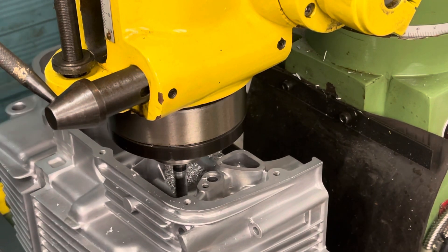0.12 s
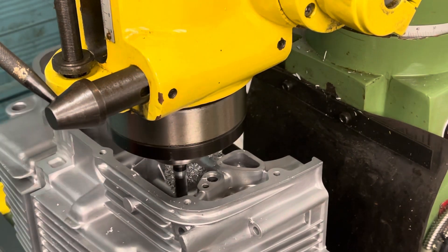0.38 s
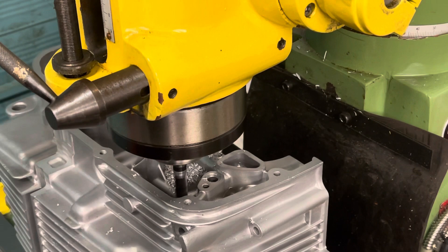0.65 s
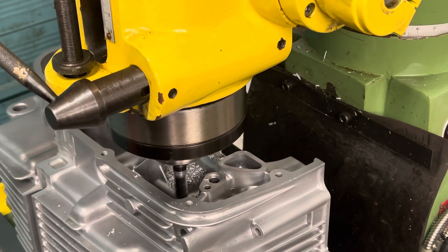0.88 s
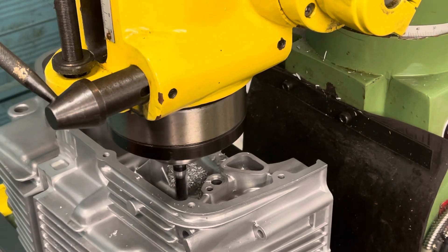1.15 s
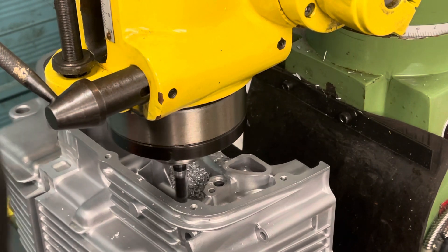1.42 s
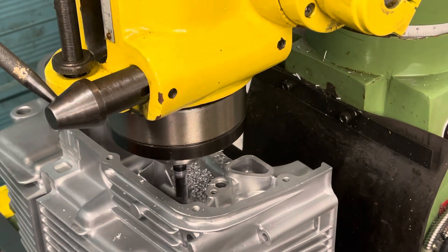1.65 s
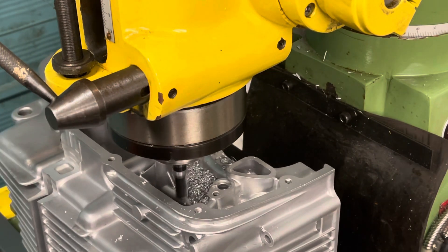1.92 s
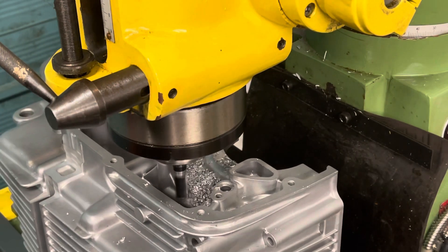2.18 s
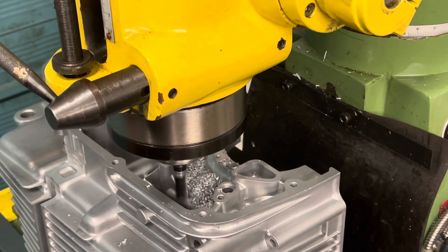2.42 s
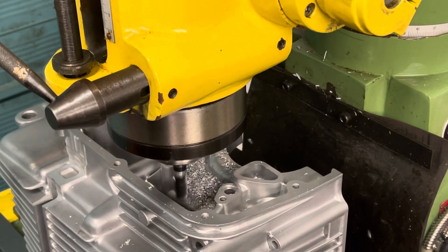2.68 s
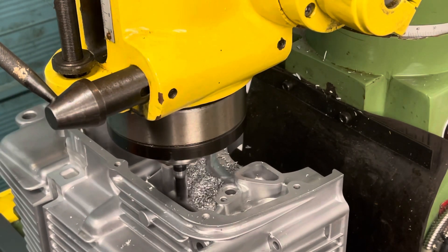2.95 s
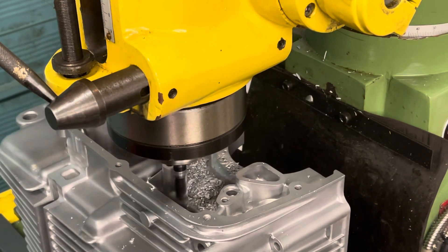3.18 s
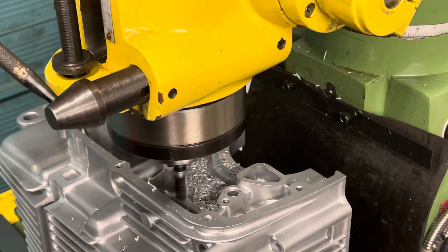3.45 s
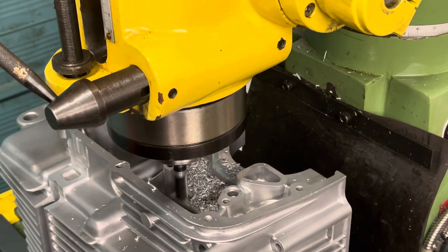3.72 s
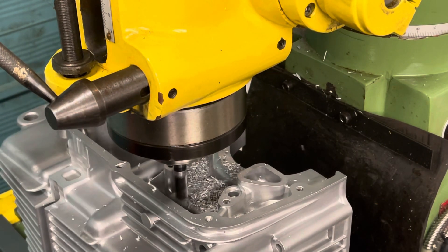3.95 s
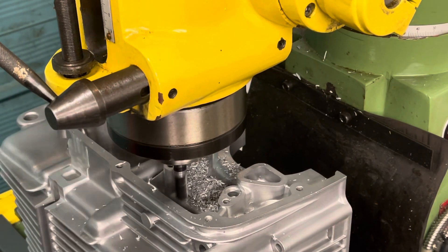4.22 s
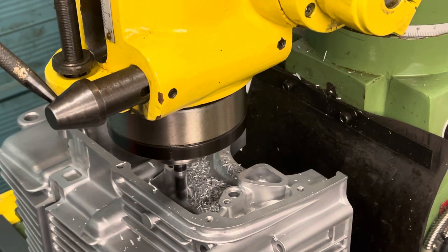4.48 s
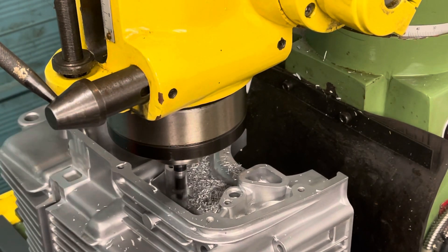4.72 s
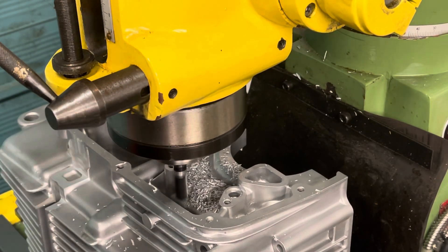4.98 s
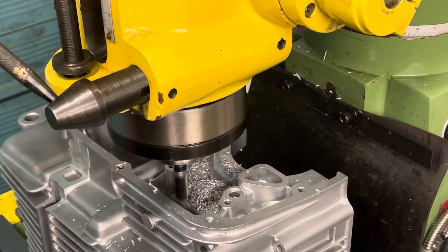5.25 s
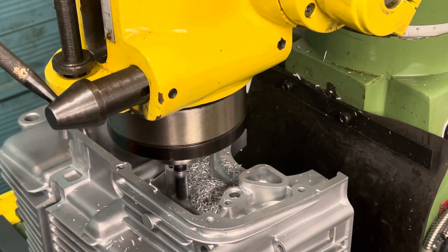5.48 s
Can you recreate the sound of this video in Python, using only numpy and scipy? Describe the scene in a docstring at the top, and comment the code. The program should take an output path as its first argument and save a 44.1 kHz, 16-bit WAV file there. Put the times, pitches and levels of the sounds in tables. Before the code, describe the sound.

Heard close in a small workshop, a milling machine runs constantly with mid hum, piercing high gear whine and bright airy hiss. An end mill bites repeatedly into an aluminium casting, each bite a buzzy singing tone with grainy chip rasp, broken by short free-running gaps. The middle bites are loudest; late ones add brief chatter whistles. Stereo phone microphone, very dry, with a tiny tail from near walls.

```python
"""A machine hums, whines and hisses close by, and a cutter sings and rasps through metal, sometimes chattering near 2 kHz.
It is a four-flute end mill, geared up to high speed, biting in and out of an aluminium casting close to a phone.
The drive all round is many thin gear, bearing and belt tones over coloured noise, sagging a little under load.
The cut straight ahead is sines at the flute rate and spindle orders, noise rung by the casting, and gliding whistles.
A short tail from the near walls differs between the two microphone channels."""
import sys
import numpy as np
from scipy import signal
from scipy.fft import rfft, irfft, next_fast_len
from scipy.io import wavfile
from scipy.ndimage import uniform_filter1d, map_coordinates

SR = 44100
rng = np.random.default_rng(int(sys.argv[2]) if len(sys.argv) > 2 else 0)


def master(y):
    """Save y as 16-bit WAV."""
    cut = np.clip(np.atleast_2d(y).T, -1, 1)
    pcm = np.round(cut * 32767)  # scale
    wavfile.write(sys.argv[1], SR, pcm.astype(np.int16))


def makeup_ratio(level_db):
    """Linear amplitude ratio for a level in decibels (20 dB per factor of ten)."""
    decades = np.asarray(level_db, float) / 20
    return 10 ** decades


N = 247663
TIME = np.arange(N) / SR
SPINDLE_HZ, CAGE_HZ, MESH_HZ = 184.87, 74.05, 872.65  # at nominal speed, as all drive tones below
PULLEY_HZ, IDLER_HZ = 70.44, 289.75

# hiss of the running drive: (frequency [Hz], relative level per hertz [dB])
HISS = [(25, -26), (160, -29), (250, -20), (400, -12.5), (520, -2.5), (1000, -3), (1600, 1), (3000, -1),
        (4700, -1.5), (5500, -5), (6200, 1.5), (8600, -2.5), (12000, -2), (15400, -2)]
# housing resonances added to the hiss: (centre [Hz], width [Hz], gain [dB])
HOUSING = [(726, 162, 16), (1450, 17, 9), (2197, 186, 8), (3860, 48, 5), (4350, 480, 1), (5160, 130, 3.5),
           (6720, 183, 9), (7300, 420, 1), (7870, 660, 3.5), (9440, 620, 5.5), (10760, 890, 8),
           (12240, 1300, -1), (13350, 480, 11), (13950, 330, 4), (14400, 160, -6), (14900, 450, 9.5),
           (15000, 280, 6)]
# likeness of the hiss at the two microphones: (frequency [Hz], correlation [0 to 1])
ALIKE = [(60, .3), (130, 0.59), (250, 0.96), (1500, 1), (3000, 0.99), (5000, 0.76), (6800, 0.44),
         (9000, 0.87), (15000, 0.98)]
# drive speed, sagging under load: (time [s], change [parts per thousand])
SPEED = [(0, 1.2), (.26, 1.7), (.6, 1.6), (.71, 1.04), (1.06, .35), (1.43, .3), (2.27, 0), (2.78, 0),
         (2.9, 1.4), (3.06, -.5), (3.11, 0), (3.45, -.2), (3.54, 1), (3.7, 1.5), (3.83, 0), (4, 0),
         (4.12, 1.46), (4.2, 1.7), (4.33, 1.3), (4.42, -.2), (4.76, 0), (4.95, 1.5), (5.26, 1.8),
         (5.35, 1.35), (5.62, 2.1)]
# hum of motor, belt and housing: (frequency [Hz], level [dB rms])
HUM = [(261.8, -82), (364.7, -75), (483.2, -57.9), (571.3, -57.5), (601.6, -49.2), (650.0, -55.4),
       (659.5, -58.3), (668.2, -58.2), (676.3, -49.8), (772.5, -51.2), (800.8, -49.0), (814.9, -57.3),
       (965.6, -64.5), (1062.5, -61.8), (1415.8, -62.8), (1421.2, -62.0), (1895.6, -56.1), (2407.7, -56.7),
       (2464.9, -61.9), (3416.4, -62.4), (3565.1, -62.8), (3627.0, -60.2), (3640.5, -61.9), (3812.7, -59.9),
       (3893.5, -60.9)]
# hum of a pulley: (order [turns], level [dB rms])
PULLEY = [(6, -70.1), (7, -55.6), (8, -56.5), (9, -49.1), (10, -48.1), (13, -63.1), (15, -64.8),
          (20, -62.7), (31, -58)]
# hum of an idler shaft: (order [turns], level [dB rms])
IDLER = [(1, -78), (2, -46), (3, -59.5), (5, -55.2)]
# whine of gears and bearings, before its swell: (frequency [Hz], level [dB rms], left over right [dB])
WHINE = [(4368.5, -45.7, -2.8), (4513.9, -59.6, -2.2), (5096.6, -57.6, 1.6), (5824.7, -62.5, -2.6),
         (6466.7, -54, .4), (6482.2, -58.3, 0), (6552.8, -48.3, -1.2), (6622.8, -56, -1.4),
         (6637.6, -59.1, 2.2), (6667.2, -47.7, 2), (6737.9, -58, 5.9), (6752.7, -46.5, 3.7),
         (6822, -48, 10), (6867.7, -51.1, 0), (6952.5, -57.9, -2.4), (7022.5, -48.5, -1.2),
         (7280.9, -50.2, 0), (7343.5, -56.1, -.5), (7637.6, -56.7, -2), (7965.3, -54.3, 1.5),
         (8008.3, -59.6, .5), (8038.6, -57.9, .6), (8737.1, -55.9, 0), (9264, -60.3, 0),
         (9292.9, -55.6, 3.5), (9465.2, -53.7, .9), (9488.1, -60, 3.5), (9528.4, -52.4, 4.8),
         (9709.5, -55.4, .7), (10263.9, -60.8, .9), (10731.6, -58.1, -.5), (10778, -56.1, -.5),
         (10805, -59.8, -1), (10850.7, -58.3, -.5), (10921.4, -50.7, 0), (10978.6, -50.8, -.4),
         (11649.5, -60.9, 0), (11861.4, -55.1, -.7), (12012.2, -59.2, -1.3), (12307.6, -60.3, 0),
         (12933.4, -60.4, 0), (13035.7, -59.3, .6), (13133.9, -58.7, 0), (13386.3, -59.7, 0),
         (13409.8, -60.7, 0), (13460.9, -52.3, 0), (13817.6, -59.9, 2.5), (14257.7, -60.2, 1.5)]
# gear mesh harmonics and cage sidebands, before the swell:
# (mesh order [1], cage turns above it [1], level [dB rms], left over right [dB])
MESH = [(5, 0, -53.5, -.6), (5, 1, -59, -.5), (6, -1, -62.7, .4), (7, 0, -61.9, 3.9), (7, 1, -63.2, 6.7),
        (8, 0, -52.5, 0), (8, 1, -61.2, 0), (9, 0, -47.7, 0), (9, 1, -52.4, 1.3), (10, 0, -59, 0),
        (11, 0, -33.8, 6.1), (11, 1, -45.6, 1.1), (12, -1, -56.6, 0), (12, 0, -46.3, 0), (12, 1, -58.3, .4),
        (12, 2, -59.5, 1.1), (12, 3, -61, .3), (13, 0, -57.6, 0), (15, -1, -53.4, -1.6), (15, 0, -47.4, 0),
        (15, 1, -53.9, 0), (16, -1, -47, 3.8), (16, 0, -52.2, 2.1), (16, 1, -46.5, 2), (17, -1, -44, 0),
        (17, 0, -53.1, 0), (18, -1, -43.1, -.3), (18, 0, -48.5, 0)]
# slow swell and sag of the whine: (time [s], gain [dB])
SWELL = [(0, 0), (1.2, 0), (2.4, 1.5), (3.9, 1.34), (4.7, -1.5), (5.1, 0.3), (5.6, 0)]
# depth of cut, heard as the flute tone before it falls away in free running: (time [s], level [dB rms])
DEPTH = [(0, -46), (.63, -53), (.81, -32.5), (1.02, -34), (1.25, -40), (1.45, -40.5), (2.35, -41),
         (2.42, -40.5), (2.59, -30.5), (2.77, -27.5), (2.84, -30.5), (2.9, -42), (2.92, -73), (2.94, -28),
         (3.3, -25.5), (3.48, -26.5), (3.7, -46.5), (3.74, -46), (3.79, -30.5), (3.86, -29), (4.11, -35.5),
         (4.34, -51), (4.38, -31), (4.77, -31.5), (4.9, -38.5), (4.98, -48.5), (5.3, -51), (5.33, -33),
         (5.45, -41), (5.62, -48.5)]
# stages of the cut, entry ramps and tails included, levels before free running silences them: (start [s], end [s],
# octave of the flute tone [dB rms], fall of the octave [dB/s], negative where it grows, runout orders [dB rms])
STAGES = [(0.675, 1.153, -34.5, 9, -46.5), (1.18, 2.402, -50.5, 3.5, -46), (2.411, 2.55, -50.5, -150, -44),
          (2.55, 2.833, -30.5, -11, -40), (2.954, 3.086, -27, -7, -38), (3.09, 3.5, -30, 5, -38.5),
          (3.516, 3.65, -42.5, 70, -44), (3.758, 3.81, -51, -300, -43.5), (3.816, 4.058, -33.5, 12, -40.5),
          (4.07, 4.126, -49, 14, -44), (4.374, 4.413, -42, -200, -37.5), (4.42, 4.78, -34.5, 13, -40),
          (4.82, 4.935, -44.5, 5, -39), (5.324, 5.365, -39.5, 120, -40.5), (5.37, 5.487, -48, 10, -42)]
# uneven flutes also sound the orders in between: (spindle order [turns], relative level [dB])
RUNOUT = [(2, -31), (5, -15.5), (7, -17.5), (9, -12.5), (10, -9.5), (11, 1.5), (13, -10.5), (14, -10.5),
          (15, -4.5), (17, -5), (18, -13), (19, -11), (21, -16), (23, -13.5)]
# the casting rings under the chips: (centre [Hz], width [Hz], gain [dB])
CASTING = [(780, 130, -10), (1460, 130, -1.5), (2090, 130, 4), (2830, 1220, 0), (3800, 140, -5)]
# bursts of chatter: (start [s], length [s], level at the swell's peak [dB rms], first pitch [Hz], last pitch [Hz])
CHATTER = [(3.87, .06, -36, 2130, 2070), (3.97, .07, -36, 2130, 2075), (4.06, .11, -38.5, 2150, 2215),
           (4.365, .04, -36, 2090, 2070), (4.41, .1, -31, 2030, 2120), (4.5, .1, -37, 2060, 2085),
           (4.59, .11, -32, 2110, 2085), (4.69, .09, -29, 2140, 2080), (4.77, .05, -36, 2090, 2150),
           (4.825, .14, -29, 2140, 2213), (5.305, .04, -35, 2080, 2140), (5.335, .2, -34, 2170, 2218)]

# how fast the layers of a stage come and go
ENTER_DB_PER_S, OCTAVE_LEAVES_DB_PER_S, ROUGH_LEAVES_DB_PER_S = 700, 376, 300
DULLS_DB_PER_S = 2.4  # third and fifth harmonics fade as chips pile up


def unit(x):
    """Scaled to rms 1."""
    return x / np.sqrt(np.mean(x ** 2) + 1e-20)


def along(points, hz):
    """Values of (Hz, value) points, joined on a log frequency axis."""
    f, v = np.transpose(points)
    return np.interp(np.log(hz + 1), np.log(f + 1), v)


def curve(rows):
    """(time, value) points joined by straight lines, one value per sample."""
    return np.interp(TIME, *np.transpose(rows))


def wobble(rate):
    """A smooth random curve, rate knots a second."""
    knots = rng.standard_normal(int(N * rate / SR) + 4)
    return map_coordinates(knots, [TIME * rate])


def resonances(modes, hz):
    """Summed gain of (Hz, width, dB) peaks."""
    return sum(makeup_ratio(db) / np.sqrt(1 + (2 * (hz - centre) / width) ** 4) for centre, width, db in modes)


def shop(x, t60):
    """Near walls: a decaying noise tail, opposite in sign at the two microphones."""
    t = np.arange(SR // 4) / SR
    tail = rng.standard_normal(len(t)) * makeup_ratio(-60 * t / t60)
    return signal.fftconvolve(x, tail / np.linalg.norm(tail))[:N] * np.array([[1], [-1]])


def shaft_time(belt_hz, belt_us, drift_us):
    """Seconds of rotation at nominal speed; the belt tugs once a turn and the speed drifts."""
    turned = np.cumsum(1 + curve(SPEED) / 1000) / SR
    tug_us = belt_us * np.sin(2 * np.pi * belt_hz * turned)
    return turned + 1e-6 * (tug_us + drift_us * wobble(25))


def hiss_spectrum(size, hiss_db, spiky_db):
    """Stereo noise spectrum of the drive, coloured by the housing and partly alike on both sides."""
    hz = np.fft.rfftfreq(size, 1 / SR)
    common, apart = rng.standard_normal((2, len(hz))) + 1j * rng.standard_normal((2, len(hz)))
    # countless faint tones make the hiss spiky on a fine scale
    faint = makeup_ratio(spiky_db * unit(uniform_filter1d(rng.standard_normal(len(hz)), size=24)))
    colour = makeup_ratio(along(HISS, hz)) * (1 + resonances(HOUSING, hz)) * faint
    angle = np.arccos(np.clip(along(ALIKE, hz), -1, 1)) / 2
    sides = np.array([[1], [-1]])
    pair = colour * (common * np.cos(angle) + sides * apart * np.sin(angle))
    return pair * makeup_ratio(hiss_db) * size / np.sqrt(2 * np.sum(abs(pair[0]) ** 2))


def add_tone(pair, at, gain, pan_db, loose):
    """One tone into a stereo spectrum: a steady core, and a loose share smeared over a few hertz so that it wavers."""
    near = np.arange(-40, 41)  # spectrum bins around the tone
    noise = rng.standard_normal(len(near)) + 1j * rng.standard_normal(len(near))
    smear = np.exp(-(near / 14) ** 2) * noise
    line = np.sqrt(1 - loose ** 2) * (near == 0) + loose * smear / np.linalg.norm(smear)
    sides = makeup_ratio(np.array([[pan_db / 2], [-pan_db / 2]]))
    pair[:, at + near] += gain * line * sides / np.linalg.norm(sides)


def random_phase():
    """A unit phasor at a random angle."""
    return np.exp(2j * np.pi * rng.random())


def add_hum(pair, size):
    """Centred tones of motor, belt and housing, and the orders of pulley and idler."""
    pulley = [(order * PULLEY_HZ, db) for order, db in PULLEY]
    idler = [(order * IDLER_HZ, db) for order, db in IDLER]
    for tone_hz, db in HUM + pulley + idler:
        add_tone(pair, round(tone_hz * size / SR), makeup_ratio(db) * size * random_phase(), 0, loose=.22)


def add_whine(pair, size):
    """Gear and bearing tones; a tone one cage turn above another is its sideband and throbs in step with it."""
    placed = {}
    mesh = [(order * MESH_HZ + turns * CAGE_HZ, db, pan_db) for order, turns, db, pan_db in MESH]
    for tone_hz, db, pan_db in sorted(WHINE + mesh):
        carrier = [place for below, place in placed.items() if abs(tone_hz - below - CAGE_HZ) < 1]
        at, phase = round(tone_hz * size / SR), random_phase()
        if carrier:
            at, phase = carrier[0][0] + round(CAGE_HZ * size / SR), carrier[0][1]
        placed[tone_hz] = at, phase
        add_tone(pair, at, makeup_ratio(db) * size * phase, pan_db, loose=.2)


def drive(shaft, hiss_db, spiky_db):
    """Tones and hiss made at steady speed, then read along the shaft's own time."""
    size, over = next_fast_len(N + SR // 4), 3  # oversampled for clean reading between samples
    steady_part = hiss_spectrum(size, hiss_db, spiky_db)
    add_hum(steady_part, size)
    whine = np.zeros_like(steady_part)
    add_whine(whine, size)
    swell = makeup_ratio(np.interp(np.arange(over * size) / (over * SR), *np.transpose(SWELL)))
    steady = over * (irfft(steady_part, over * size) + swell * irfft(whine, over * size))
    # reading starts a few samples in
    return np.array([map_coordinates(side, [shaft * SR * over + 9]) for side in steady])


def order_tone(shaft, order):
    """A sine of rms 1 at a multiple of the spindle's turning."""
    return np.sqrt(2) * np.sin(2 * np.pi * (round(order) * SPINDLE_HZ * shaft + rng.random()))


def wavering(shaft, order, db, waver_db):
    """A spindle order whose level wavers at random."""
    return makeup_ratio(db + waver_db * wobble(10)) * order_tone(shaft, order)


def engaged(db, free_db):
    """Gain of a layer; below free_db the tool runs free and the layer falls silent."""
    return makeup_ratio(db) / (1 + makeup_ratio(4.3 * (free_db - db)))


def stage_level(db, fall, leaves_db_per_s):
    """Level in dB over time: each stage enters fast, falls or grows along its length and dies away after its end."""
    start, end = np.transpose(STAGES)[:2, :, None]
    held = db[:, None] - fall[:, None] * np.clip(TIME - start, 0, end - start)
    edges = ENTER_DB_PER_S * np.maximum(start - TIME, 0) + leaves_db_per_s * np.maximum(TIME - end, 0)
    return np.max(held - edges, axis=0)


def chip_rasp(shaft):
    """Chips rasp into the casting: noise pulsing once a flute, through its resonances and a low cut."""
    chips = rng.standard_normal(N) * (1 + .6 * order_tone(shaft, 4)) * makeup_ratio(1.4 * wobble(40))
    size = next_fast_len(N)
    hz = np.fft.rfftfreq(size, 1 / SR)
    low_cut = hz ** 2 / (hz ** 2 + 350 ** 2)
    return unit(irfft(rfft(chips, size) * resonances(CASTING, hz) * low_cut, size)[:N])


def rough_cut(shaft, waver_db):
    """The weaker runout orders of the uneven flutes, with the rasp of the chips."""
    runout = np.transpose(STAGES)[4]
    runout_db = stage_level(runout, 0 * runout, ROUGH_LEAVES_DB_PER_S) + 0.4 * wobble(15)
    orders = unit(sum(wavering(shaft, order, db, waver_db) for order, db in RUNOUT))
    rasp_db = -5.5 + 1.44 * TIME  # against the runout orders; grows as chips pile up
    return engaged(runout_db, -48.5) * (orders + makeup_ratio(rasp_db) * chip_rasp(shaft))


def singing_flutes(shaft, waver_db):
    """Four flutes a turn sing at spindle order 4 and its harmonics, each layer following the cut."""
    flute_db = curve(DEPTH)
    octave, fall = np.transpose(STAGES)[2:4]
    octave_db = stage_level(octave, fall, OCTAVE_LEAVES_DB_PER_S) + 1.6 * wobble(15)
    sing = engaged(flute_db, -50) * order_tone(shaft, 4) + engaged(octave_db, -57) * order_tone(shaft, 8)

    # third and fourth harmonics together: -42 dB at a -37 dB octave
    follows = 0.49  # dB per dB of octave
    higher_db = stage_level(-42 + follows * (octave + 37), follows * fall, OCTAVE_LEAVES_DB_PER_S)
    # third against the fourth: light bites favour it
    lightness_db = -0.68 * (np.clip(octave_db, octave.min(), -36) + 37)
    third_db = 4 - DULLS_DB_PER_S * TIME + lightness_db
    higher = wavering(shaft, 12, third_db, waver_db) + wavering(shaft, 16, 0, waver_db)
    higher /= np.sqrt(1 + makeup_ratio(2 * third_db))

    # fifth harmonic: starts from -41.5 dB at a -33 dB flute tone and vanishes in shallow cuts
    fifth_db = -41.5 - DULLS_DB_PER_S * TIME + 0.3 * (flute_db + 33)
    fifth = wavering(shaft, 20, fifth_db, waver_db) / (1 + makeup_ratio(5.3 * (-38 - flute_db)))
    return sing * makeup_ratio(0.69 * wobble(30.01)) + engaged(higher_db, -61.0) * higher + fifth


def chatter(shaft, rough_hz):
    """The tool whistles at its own pitch; the turning spindle adds a copy one order below."""
    out = np.zeros(N)
    for start, length, db, first_hz, last_hz in CHATTER:
        u = np.clip((TIME - start) / length, 0, 1)
        hz = last_hz + (first_hz - last_hz) * (1 - u) ** 2.8
        swell = abs(np.sin(np.pi * u ** .55) ** .7)
        phase = 2 * np.pi * np.cumsum(hz + rough_hz * wobble(60)) / SR
        copy_db = 3 + 1.4 * (hz + last_hz - 24 * SPINDLE_HZ)  # the copy strengthens with pitch
        copy = makeup_ratio(copy_db) * np.sin(phase - 2 * np.pi * SPINDLE_HZ * shaft)
        out += np.sqrt(2) * swell * makeup_ratio(db + 2 * wobble(22)) * (np.sin(phase) + copy)
    return out


def scene():
    """The drive all round, the cut straight ahead, the near walls behind both."""
    shaft = shaft_time(belt_hz=11.6, belt_us=5.5, drift_us=2)
    machine = makeup_ratio(0.18 * wobble(2.91)) * drive(shaft, hiss_db=-34, spiky_db=2.0)
    cut = singing_flutes(shaft, waver_db=1.3) + rough_cut(shaft, waver_db=1.3)
    tool = cut + chatter(shaft, rough_hz=4)
    walls = shop(makeup_ratio(-24) * tool + makeup_ratio(-41.5) * machine.mean(axis=0), t60=0.049)
    return machine + tool + walls


def roll_off(x):
    """The treble ends steeply here."""
    return signal.sosfilt(signal.butter(12, 16970, fs=SR, output="sos"), x)


def record(dry):
    """The phone keeps nothing above its band limit."""
    size, top_hz = next_fast_len(N), 15760
    in_band = np.fft.rfftfreq(size, 1 / SR) < top_hz
    kept = irfft(rfft(dry, size) * in_band, size)[:, :N]
    return roll_off(kept)


dry = scene()
out = record(dry)
master(out)
```